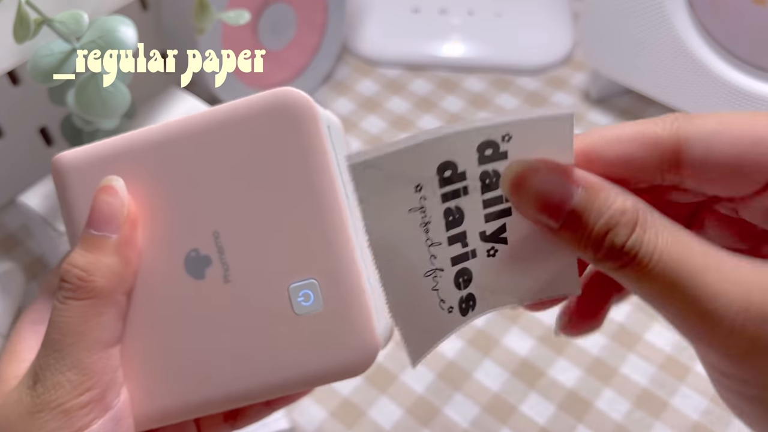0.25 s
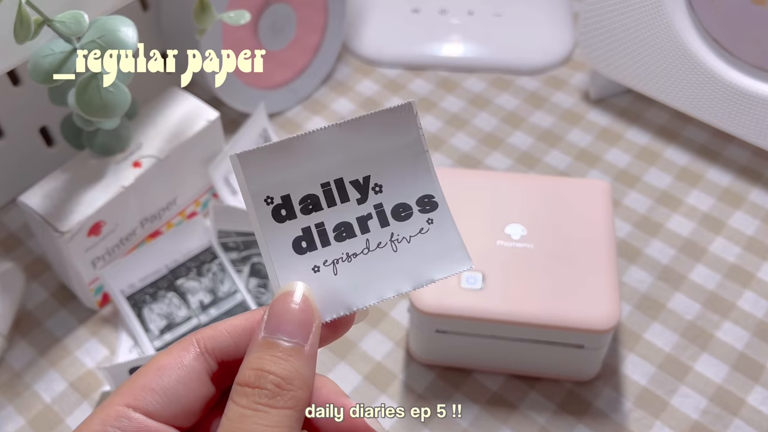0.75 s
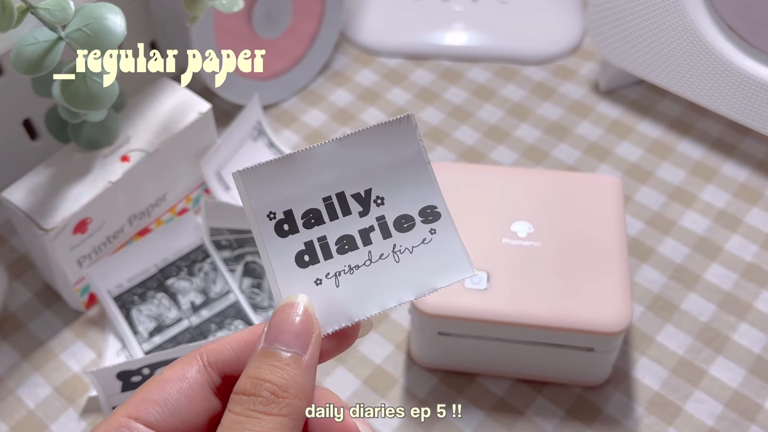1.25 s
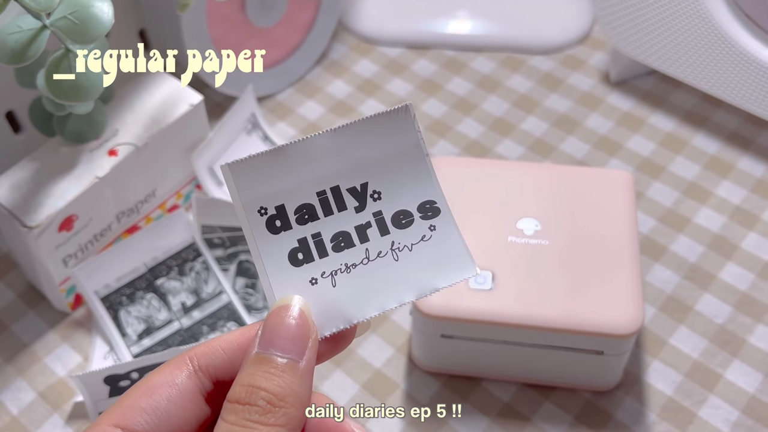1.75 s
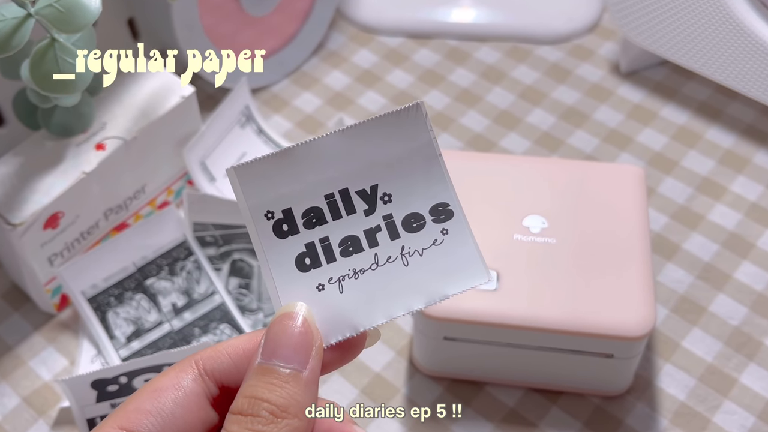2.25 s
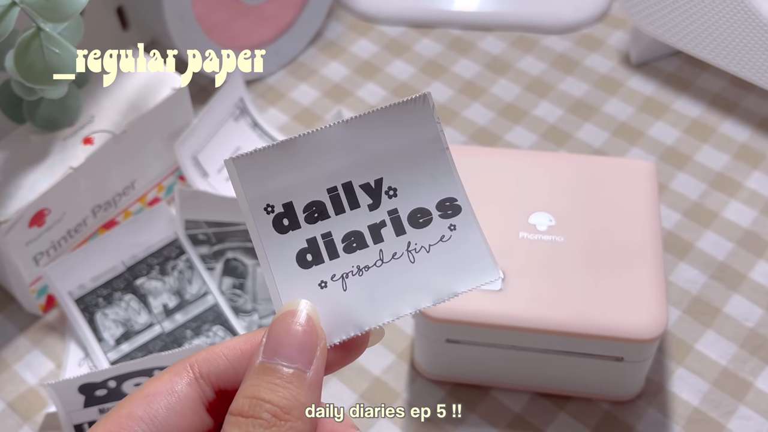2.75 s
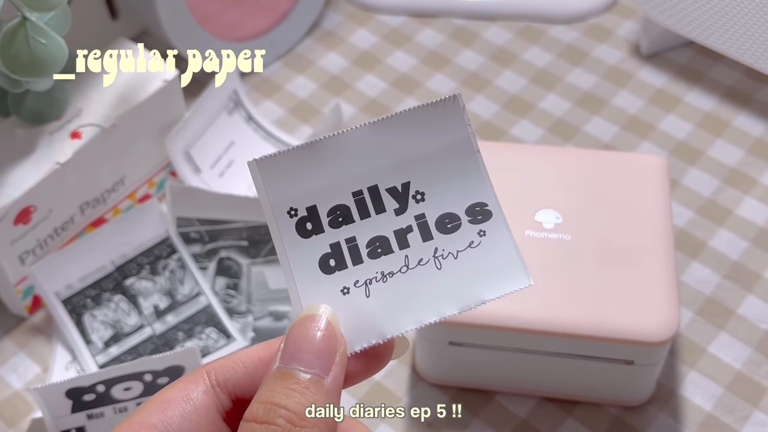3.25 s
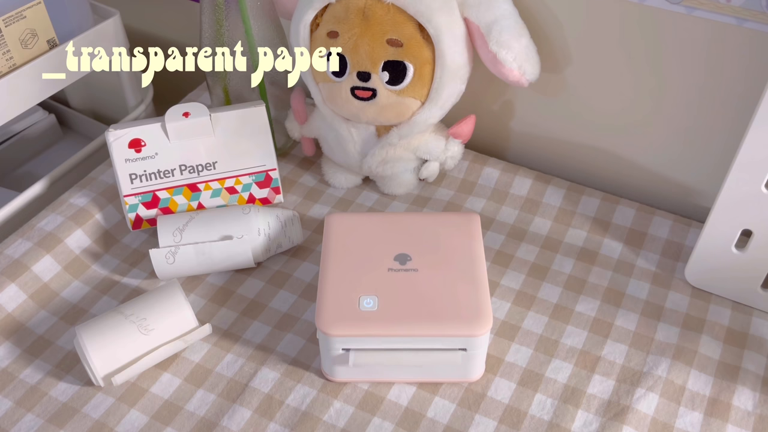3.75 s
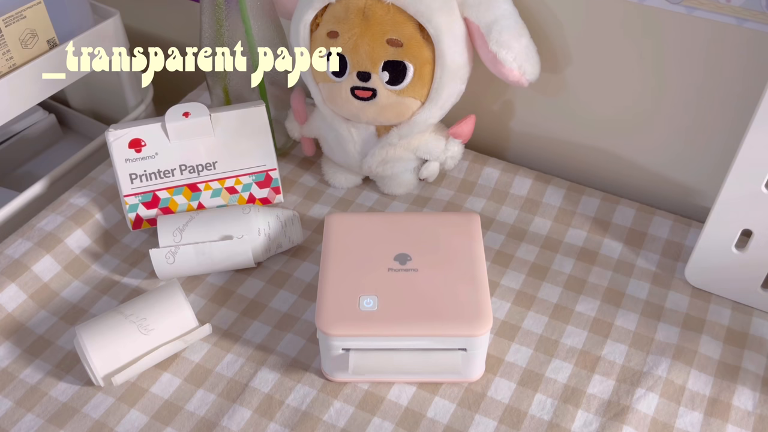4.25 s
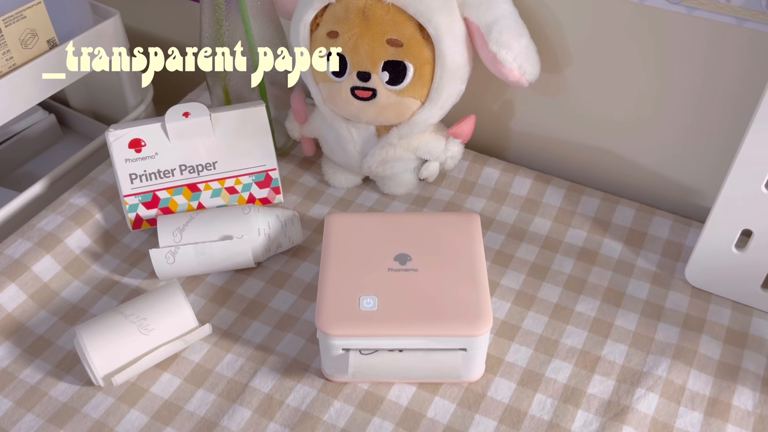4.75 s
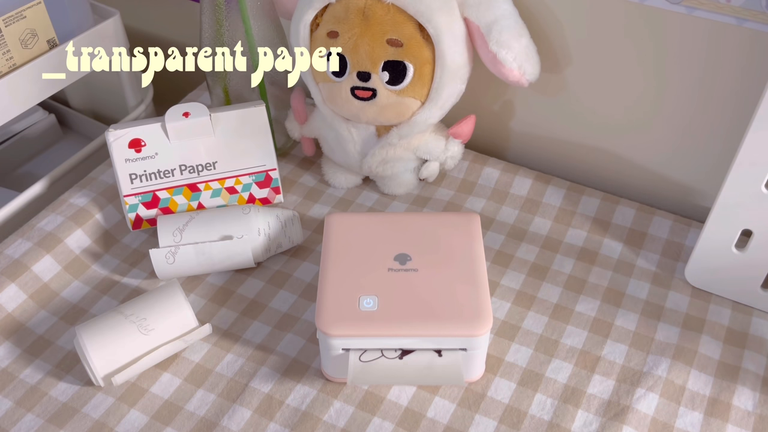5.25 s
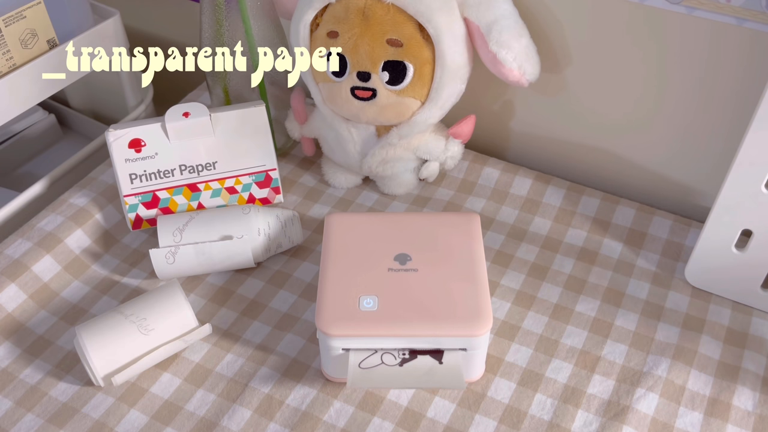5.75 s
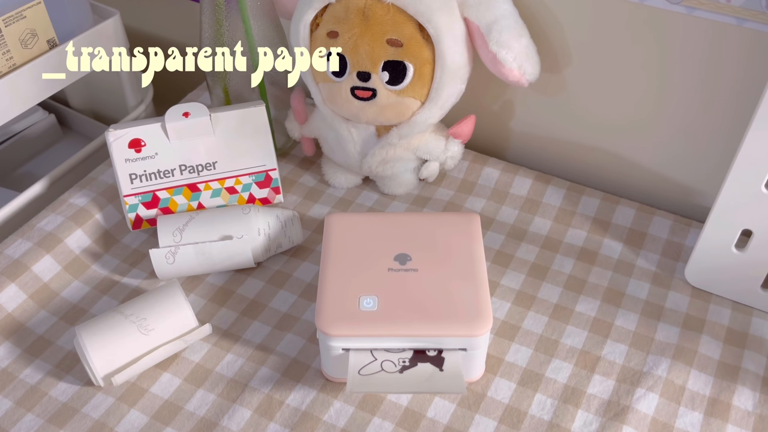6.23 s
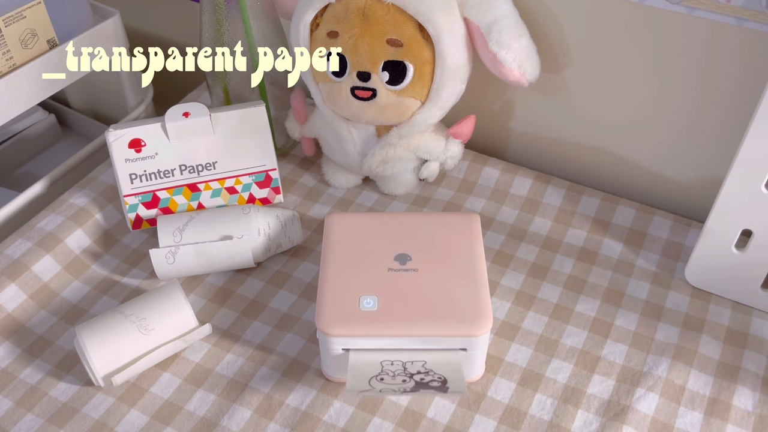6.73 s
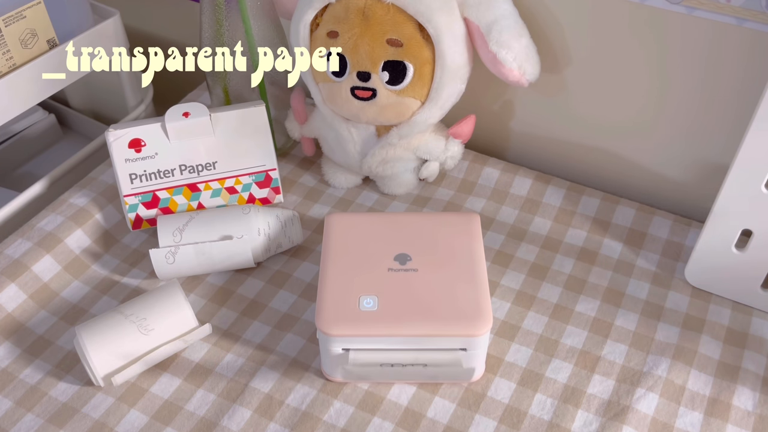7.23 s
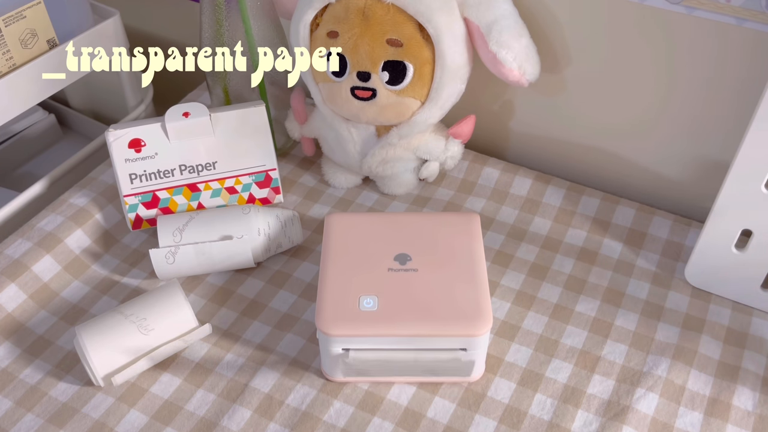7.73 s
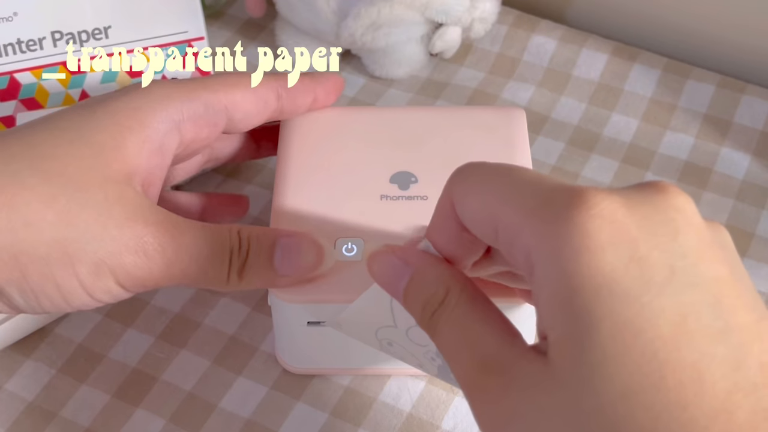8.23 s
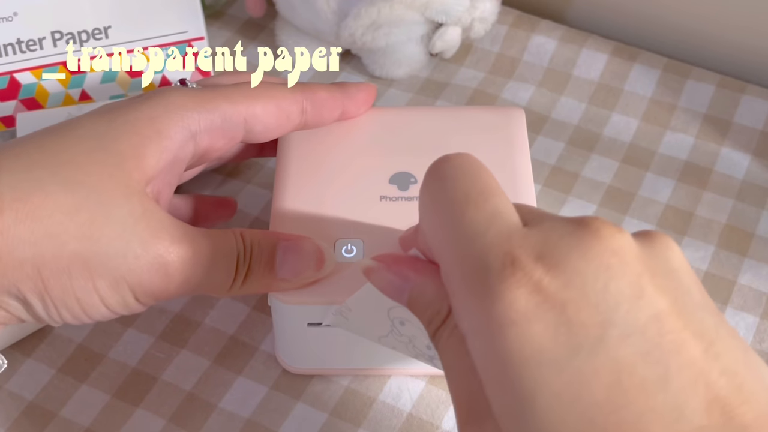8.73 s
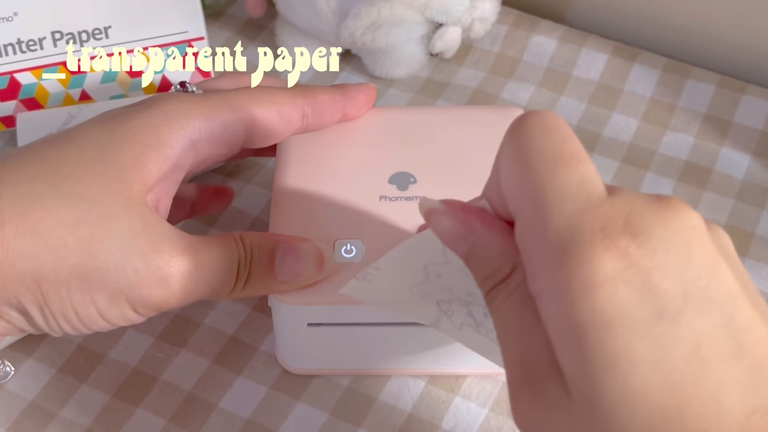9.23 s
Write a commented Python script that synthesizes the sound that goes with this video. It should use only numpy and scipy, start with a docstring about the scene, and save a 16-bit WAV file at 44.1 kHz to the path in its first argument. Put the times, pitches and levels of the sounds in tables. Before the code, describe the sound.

Close stereo pickup on a desk in a quiet room with faint low rumble. Thin paper rustles briefly, with one small crack and a crisp double-snap mouse click. After nearly three seconds of quiet, an identical click starts a small printer motor, buzzing steadily at low pitch with gear rattle. It stops abruptly; light paper touches follow, then a slip is torn off in increasingly loud, dry cracks.

```python
"""Paper rustles under moving fingers, as swelling noise bands, over a room's rumbling, hissing filtered noise.
A small thermal printer lies on a desk close to two microphone ports. One early crack is heard, then a mouse button
clicks, press and release, twice identically: noise bursts through resonances. The stepper motor, a sum of
harmonics with gear noise, feeds a slip out. A hand tears it off tooth by tooth, the cracks exciting the modes
of lid and case."""
import sys
import numpy as np
from scipy import signal
from scipy.fft import rfft, irfft, next_fast_len
from scipy.io import wavfile
from scipy.ndimage import uniform_filter1d, map_coordinates

SR = 44100
rng = np.random.default_rng(int(sys.argv[2]) if len(sys.argv) > 2 else 0)


def to_linear_factor(level_db):
    """Convert decibel levels (scalar or array-like) to linear amplitude factors."""
    exponent = np.asarray(level_db, float) / 20
    return 10 ** exponent


def persist_wave(psi):
    """Save psi, clipped to +-1, as 16-bit WAV."""
    counts = np.round(np.clip(psi, -1, 1) * 32767).astype(np.int16)
    wavfile.write(sys.argv[1], SR, np.atleast_2d(counts).T)


N = 418068
T = np.arange(N) / SR  # time in seconds

# Level of the room's rumble. Each row: time in seconds, level in dB.
RUMBLE_LEVEL = [(0.0, -44), (0.36, -52.5), (0.79, -43.5), (1.4, -46), (2.3, -42.5), (2.66, -36),
                (2.87, -44), (3.5, -44.5), (3.83, -52), (4.81, -48), (5.6, -51), (7.14, -47.5), (7.33, -57),
                (7.71, -49), (7.97, -54), (8.35, -48), (8.5, -37.5)]
# Spectrum of the rumble. Each row: frequency in Hz, relative density in dB.
RUMBLE_SPECTRUM = [(15, -39.5), (25, -9.5), (48, 3.5), (69, -0.5), (83, -7), (108, -17), (141, -19),
                   (172, -32), (400, -44.5), (520, -73), (880, -120)]
# Spectrum of the steady hiss. Each row: frequency in Hz, relative density in dB.
HISS_SPECTRUM = [(120, -31), (200, -1.5), (269, -6.5), (361, -8.5), (445, -12), (609, -12), (791, -14),
                 (1450, -16), (2130, -19.5), (3130, -16.5), (4200, -23), (6610, -22), (10400, -29),
                 (11100, -23), (12800, -33), (16600, -64), (22000, -120)]
HISS_DB = -68
HUM_UNDER_DB, HUM_WAVERS_DB = -21.5, 3  # the hum under the rumble, and its own slow wander

# Fingers sliding on paper, a stroke a row. Each row: peak in seconds, scrape in dB, hiss in dB,
# swell in seconds, fade in seconds.
STROKES = [(0.0, -56.5, -69.5, .01, 0.16), (.192, -73, -70, 0.037, .15), (.3, -71, -59, 0.18, .045),
           (.35, -69, -74, .04, 0.3), (.474, -65.5, -68, 0.063, .06), (.658, -61, -45.5, 0.065, 0.044),
           (.73, -74, -52.5, 0.079, 0.032), (7.342, -62, -95, .03, 0.094), (7.375, -62, -95, .05, .07),
           (7.618, -79.5, -84, .02, .08), (7.73, -86, -63.5, 0.18, 0.1), (7.816, -71.5, -79, .04, .01),
           (8.202, -73, -93, .08, .04), (8.298, -88, -72, .09, 0.033), (8.418, -90, -64.5, 0.014, .06),
           (8.442, -73, -53, 0.027, 0.025), (8.495, -90, -68, .02, .02), (8.54, -90, -73, .04, .02),
           (8.598, -60, -44.5, 0.023, 0.061), (8.835, -58, -49, 0.024, 0.022)]
STROKE_SPAN_DB = 36  # how far a stroke swells and fades in those times

# Brief narrow tones. Each row: start in seconds, centre in Hz, width in Hz of each of two cascaded resonances,
# level in dB, held time in seconds, t60 in seconds.
SQUEAKS = [(0, 951, 70, -61.5, 0.036, .5), (7.338, 1343, 81, -62.5, 0.055, .05)]

# Teeth letting go. Each row: time in seconds, relative crack in dB, case knock relative to crack in dB,
# lid rap relative to crack in dB.
TEETH = [(0.6512, -24, -32.5, -12.5), (8.249, -66.5, 15.5, -5), (8.4294, -54, -17, -31),
         (8.4419, -43, -13, -33), (8.5822, -48, -20.5, -25), (8.5993, -40, -20, -29),
         (8.6074, -42, -9, -16), (8.6482, -27.5, -3.5, -7.5), (8.6963, -30.5, -12, -26),
         (8.7018, -25.5, -24, -24), (8.7069, -21.5, -8, -19), (8.74, -33.5, 9, -20.5),
         (8.843, -15.5, -4.5, -5), (8.8616, -19.5, -2, -6.5), (8.8916, -20.5, -0.5, 0),
         (8.9012, -33, 13.5, 0), (8.9333, -13, -2.5, -7.5), (8.969, -11, -5, -7.5), (8.978, -8.5, -3.5, -5),
         (9.0951, -8.5, -12, 1.5), (9.1008, -4.5, -13.5, -3.5), (9.1077, -7, -10.5, -29.5),
         (9.1174, -11.5, -2, -4), (9.1247, -11.5, -4, 6.5), (9.132, -8, -2, -6.5), (9.1371, -17.5, 3.5, -9),
         (9.1463, -16.5, 4.5, -11), (9.1533, -9.5, -3, -8.5), (9.2423, -6.5, -10.5, -4),
         (9.2708, -4, -9.5, -11), (9.3536, 0, -16.5, -7.5), (9.4425, -11, -4, -3.5),
         (9.4532, -1, -12.5, -9), (9.4595, -11.5, -4.5, 4), (9.4734, -4, -13, -1.5)]
# Spectrum of a crack. Each row: frequency in Hz, relative density in dB.
CRACK_SPECTRUM = [(1470, -28), (2500, -3.5), (3040, -11), (4050, 0), (4510, -3), (4870, 0), (7300, -13.5),
                  (8200, -7.5), (10200, -4), (11100, 1), (12300, -11.5), (13600, -28.5), (16000, -22.5)]
# Resonances of the case. Each row: frequency in Hz, width in Hz, strength in dB.
CASE_MODES = [(53.6, 14, -5.5), (100.6, 13, 0), (250, 40, 4), (426, 52, -1.5)]
# Resonances of the lid. Each row: frequency in Hz, width in Hz, strength in dB.
LID_MODES = [(548.4, 100, 1.5), (690, 91, 2.5), (804, 110, 0), (1040, 130, 3), (1280, 160, 1.5),
             (1550, 290, -6.5), (1900, 220, -8), (2620, 300, -8)]
CRACK_T60_S = 0.013
# Phase between the ports for the cutter. Each row: frequency in Hz, left lead in radians.
TEAR_LEAD = [(0, 0), (780, -1.5), (1030, -3.5), (2070, 1.96), (3700, 2), (3960, 1.25), (4480, 4),
             (5340, 3.5), (6200, 9), (7060, 3.6), (7920, -0.3), (8870, -0.5), (13100, -9), (15700, -11.5)]
# Balance of the ports for the cutter. Each row: frequency in Hz, left over right in dB.
TEAR_TILT = [(60, -0.5), (110, -1.5), (200, 2.5), (380, -2.5), (700, 2.0), (1290, 0.0), (2380, 1.5),
             (4400, 4.0), (8120, 0.5), (15000, -0.5)]
TEAR_PORTS = TEAR_LEAD, TEAR_TILT

# Start of each mouse click. Each entry: time in seconds.
CLICKS = [.7584, 3.6017]
# Contacts on press. Each row: delay after the click in seconds, relative level in dB, t60 in seconds.
PRESS_CONTACTS = [(0, -31, .02), (.001, -19.5, .006), (.0033, -10, 0.0034), (.0039, -7.5, .003),
                  (.0046, -6.5, 0.0034), (.0054, -17, .02), (.014, -45, 0.049)]
# Contacts on release. Each row: delay after the click in seconds, relative level in dB, t60 in seconds.
RELEASE_CONTACTS = [(.11, -10.5, 0.0048), (.1106, -5.5, .003), (.1114, -7.5, .004), (.112, -11, .012),
                    (.1148, -27, .015), (.123, -45, 0.064)]
# Resonances on press. Each row: frequency in Hz, width in Hz before broadening, strength in dB.
PRESS_MODES = [(2070, 71, -14), (2760, 88, -11.5), (4100, 280, -8.5), (5500, 620, -11), (6290, 130, 0),
               (7750, 120, -7), (8736, 530, -2.5), (9970, 150, 2), (11100, 220, -10), (12700, 200, -2.5),
               (13980, 340, -6)]
# Resonances on release. Each row: frequency in Hz, width in Hz before broadening, strength in dB.
RELEASE_MODES = [(1900, 300, -17.5), (2740, 330, -16), (3502, 130, -9.5), (3800, 169.7, -8),
                 (4658, 120, -10), (6520, 170, -2.5), (7966, 190, -11), (8880, 210, -9), (10566, 130, 1.5),
                 (10930, 430, -11), (13220, 190, -6.5), (13620, 360, -4.5), (15600, 170, -19)]
# Thuds of the mouse's shell. Each row: delay after the click in seconds, frequency in Hz, level in dB,
# t60 in seconds.
SHELL_THUDS = [(.002, 289.3, -19.5, 0.021), (.006, 859, -25, 0.027), (.004, 560, -31, 0.019),
               (.02, 120, -31, 0.073), (0.1087, 200, -13.5, .022), (.111, 894, -34, .015)]
# Faint hiss around each mouse click. Each row: time from the click in seconds, level in dB.
CLICK_HISS_LEVEL = [(-.004, -110), (-.003, -57.5), (.03, -57.5), (.07, -67.5), (.105, -57), (.12, -64.5),
                    (.13, -59), (.17, -68.5), (.18, -110)]

# Power to the motor. Entries: on in seconds, off in seconds.
POWER = (3.63, 7.204)
# Stages of the job. Each row: start in seconds, strain from 0 to 1, slack from 0 to 1.
STAGES = [(3.63, 0.14, .15), (5.065, .75, .2), (5.13, .45, .2), (5.76, 0.86, .3), (6.37, 0.42, 0.9)]
SHIFT_S, SURGE = 0.013, 0.21  # one stage blends into the next; the load surges by this share
PRINT_HZ, EJECT_HZ, EJECT_S = 234.14, 235.58, 6.37  # coil rate printing, then feeding blank paper from then on
STALL_HZ, STALL_S = 112, .021  # without power the rate sags to this, this fast
# Partials of the coils. Each row: multiple of the coil rate, level running light in dB, level under strain in dB,
# left lead in radians, left over right in dB.
COIL_PARTIALS = [(0.5, -15.0, -12.0, 0.0, -7.0), (1.0, 0.0, 1.0, -0.1, 0.0),
                 (1.5, -22.0, -21.0, -0.1, -1.0), (2.0, -14.0, -21.0, -1.0, -5.0),
                 (2.5, -13.0, -17.0, -0.1, -10.0), (3.0, -11.0, -12.0, 1.6, 2.0),
                 (4.0, -13.0, -14.0, 0.4, 1.0), (4.5, -28.0, -29.0, -0.6, 4.0),
                 (5.0, -14.0, -16.0, 0.2, -5.0), (5.5, -21.0, -24.0, -0.2, -1.0),
                 (6.0, -22.0, -24.0, -0.3, 2.0), (6.5, -26.0, -26.0, -0.3, 10.0),
                 (7.0, -33.0, -37.0, 0.2, 6.0), (7.5, -35.0, -31.0, 1.9, 9.0),
                 (8.0, -26.0, -21.0, -0.6, 11.0), (9.5, -26.0, -27.0, 2.3, 0.0),
                 (10.0, -14.0, -12.0, 1.8, 2.0), (10.5, -33.0, -31.0, 1.1, 2.0),
                 (11.0, -29.0, -24.0, 2.2, 4.0), (12.0, -34.0, -17.0, 1.6, 0.0),
                 (13.0, -35.0, -34.0, -2.6, 5.0), (14.0, -33.0, -18.0, 2.0, 4.0),
                 (15.0, -39.0, -38.0, 1.4, 0.0), (16.0, -36.0, -22.0, 0.8, 8.0),
                 (17.0, -42.0, -39.0, 2.4, 3.0), (18.0, -36.0, -31.0, -2.8, 2.0),
                 (19.0, -39.0, -32.0, 2.7, 9.0), (20.0, -21.0, -24.0, -2.0, 5.0),
                 (21.0, -39.0, -28.0, -2.6, 7.0), (22.0, -35.0, -18.0, 2.1, 2.0),
                 (22.5, -36.0, -23.0, 2.9, 9.0), (23.0, -36.0, -33.0, 2.3, 7.0),
                 (23.5, -38.0, -36.0, -2.9, 7.0), (24.0, -33.0, -28.0, 3.1, 3.0),
                 (25.0, -56.0, -38.0, -2.5, 2.0), (26.0, -42.0, -34.0, -2.3, 3.0),
                 (28.0, -49.0, -41.0, 0.6, 2.0), (30.0, -44.0, -36.0, 2.7, 0.0),
                 (32.0, -43.0, -29.0, 2.3, 10.0), (34.0, -51.0, -30.0, 0.0, 4.0),
                 (36.0, -47.0, -38.0, -0.1, 0.0), (42.0, -41.0, -39.0, -2.9, 0.0),
                 (44.0, -47.0, -28.0, 3.1, 0.0), (45.0, -46.0, -33.0, 2.8, 0.0),
                 (46.0, -46.0, -31.0, 2.4, 1.0), (48.0, -50.0, -45.0, 1.4, 0.0),
                 (50.0, -47.0, -48.0, 0.0, 0.0), (52.0, -48.0, -50.0, -0.0, 0.0)]
# Spectrum of the gears' whirr. Each row: frequency in Hz, relative density in dB.
WHIRR_SPECTRUM = [(60, -42), (110, 1), (300, -13.5), (700, -6), (1200, -11.5), (1600, -19), (2200, -11.5),
                  (2700, -27.5), (3500, -40), (6000, -93.5)]
# Spectrum of the gears' rattle before strain brightens it. Each row: frequency in Hz, relative density in dB.
RATTLE_SPECTRUM = [(1470, -35.5), (2500, -9.5), (2900, -1.5), (2960, -3.5), (3200, 3.5), (3950, -6.5),
                   (4820, 1.5), (6210, -9), (7680, -10.5), (10000, -13.5), (11200, -14.5), (12700, -22),
                   (13500, -51.5)]
TONE_DB, WHIRR_DB = -46, -55  # the tone's level is that of a partial at 0 dB
RATTLE_DB, STRAINED_RATTLE_DB = -66, 4  # before strain and slack; the last is added at full strain
# The two ports for the motor, two lists. Each row of the first: frequency in Hz, left lead in radians;
# of the second: frequency in Hz, left over right in dB.
FEED_PORTS = [(0, -0.5), (690, 2), (1890, 0.58), (2240, 1.46), (3270, 1.5), (4480, -0.5), (5680, 1.5),
              (6550, -0.6), (8790, 1.96), (9730, -5), (10600, -10.5), (11600, -1), (12500, -10.5),
              (15700, -15.5)], [(60, -6), (110, -8), (200, 2), (380, 0.5), (700, -2), (1290, 4),
              (2380, 1.5), (4400, 8), (8120, 1), (15000, -1.5)]

# The room's answer. Each row: frequency in Hz, t60 in seconds, relative strength in dB.
WALLS = [(150, 0.52, -15.5), (493, 0.12, 2.5), (2000, 0.297, -6), (5070, 0.17, -5), (12000, 0.41, -11.5),
         (14000, 0.12, -22)]


def unit(x):
    """Normalisation: scaled to rms 1."""
    return x / np.sqrt(np.mean(x ** 2) + 1e-20)


def along(points, hz):
    """Interpolation of (Hz, value) points on a logarithmic frequency axis."""
    f, v = np.transpose(points)
    return np.interp(np.log(hz + 1), np.log(f + 1), v)


def curves(rows):
    """Linear interpolation: one value per sample for each column after the time."""
    s, *cols = np.transpose(rows)
    return [np.interp(T, s, c) for c in cols]


def wobble(rate):
    """Band-limited fluctuation: a smooth random curve, rate knots a second."""
    return map_coordinates(rng.standard_normal(int(N * rate / SR) + 4), [T * rate])


def filtered(x, response):
    """Linear filtering: the spectrum of x times a complex response of frequency."""
    n = x.shape[-1]
    m = next_fast_len(n + 8192)
    return irfft(rfft(x, m) * response(np.fft.rfftfreq(m, 1 / SR)), m)[..., :n]


def coloured(x, spectrum):
    """Spectral shaping: x through a (Hz, dB) spectrum, rms 1."""
    return unit(filtered(x, lambda hz: to_linear_factor(along(spectrum, hz))))


def modes(table):
    """Modal superposition: the causal response of (Hz, width, dB) resonances, alternating in sign."""
    def response(f):
        total = 0
        for k, (centre, width, db) in enumerate(table):
            damping = 1j * f * width
            total = total + (-1) ** k * to_linear_factor(db) * damping / (centre * centre - f * f + damping)
        return total
    return response


def pair(spectrum, share):
    """Partial coherence: stereo noise with a share of its power common to both ports."""
    common, left, right = rng.standard_normal((3, N))
    share = np.clip(share, 0, 1)
    return coloured(np.sqrt(share) * common + np.sqrt(1 - share) * np.array([left, right]), spectrum)


def dying(s, db, t60, t):
    """Exponential decay: an envelope that jumps up at s and falls 60 dB in t60."""
    return to_linear_factor(db - 60 * np.clip(t - s, 0, 1) / t60) * (t >= s)


def ports(x, table):
    """Near-field reception: a near source reaches the two ports with its own phase and balance."""
    lead, tilt = table
    side = np.array([[.5], [-.5]])

    def response(hz):
        phase = side * np.interp(hz, *np.transpose(lead))
        return to_linear_factor(side * along(tilt, hz)) * np.exp(1j * phase)
    return filtered(x, response)


def walls(x):
    """Reverberation: each frequency of the room's answer has its own strength and rate of decay."""
    hz, t, z = signal.stft(rng.standard_normal((2, SR // 2)), SR, nperseg=256)
    t60, db = (along([(row[0], row[k]) for row in WALLS], hz)[:, None] for k in (1, 2))
    tail = signal.istft(z * to_linear_factor(db - 60 * t / t60) / np.sqrt(t60), SR, nperseg=256)[1]
    tail = tail / np.linalg.norm(tail[0])
    delayed = np.pad(x, (200, 0))  # samples
    return signal.fftconvolve(delayed[None], tail, axes=1)[:, :N]


def rub():
    """Sliding friction on thin paper: a dull scrape and a bright, grainy hiss swell and fade with each stroke."""
    grain = to_linear_factor(2.5 * wobble(300))
    scrape = pair([(100, -120), (400, -27), (900, -2.5), (1400, -5), (3500, -4.5), (6000, -23.5),
                   (16000, -120)], share=0.46)
    hiss = pair([(500, -120), (2500, -22), (5500, -11.5), (7500, -12.5), (9200, -2.5), (10300, -10.5),
                 (11300, -0.5), (12500, -10.0), (16000, -120)], share=0.4)
    low, high = np.zeros((2, N))
    for s, scrape_db, hiss_db, swell, fade in STROKES:
        near = slice(max(0, round((s - 2 * swell) * SR)), round((s + 2 * fade) * SR))
        stroke = to_linear_factor(-STROKE_SPAN_DB * np.maximum((s - T[near]) / swell, (T[near] - s) / fade))
        low[near] += to_linear_factor(scrape_db) * stroke
        high[near] += to_linear_factor(hiss_db) * stroke
    return grain * (low * scrape + high * hiss)


def room():
    """Ambient noise: low rumble, a wavering hum that swells with it and a steady hiss."""
    rumble_db, = curves(RUMBLE_LEVEL)
    balance = [[.5], [-.5]]  # dB, left and right
    rumble = to_linear_factor(rumble_db + balance + 1.6 * wobble(6)) * pair(RUMBLE_SPECTRUM, share=0.94)
    hum_db = rumble_db + HUM_UNDER_DB + HUM_WAVERS_DB * wobble(1.7)
    hum = to_linear_factor(hum_db) * pair([(90, -43.0), (125, -6), (140, 1.5), (155, -8.5), (200, -40.0), (400, -120)],
                             share=0.44)
    return rumble + hum + to_linear_factor(HISS_DB) * pair(HISS_SPECTRUM, share=0.028)


def squeaks():
    """Narrow-band resonance: noise confined to slim bands that hold briefly and fade."""
    total = np.zeros((2, N))
    for s, hz, width, db, held, t60 in SQUEAKS:
        resonance = modes([(hz, width, 0)])
        band = unit(filtered(rng.standard_normal((2, N)), lambda f: resonance(f) ** 2))
        total += (T >= s) * to_linear_factor(db - 60 * np.clip(T - s - held, 0, 9) / t60) * band
    return total


def tear():
    """Impulsive excitation of modes: each tooth's short crack raps the lid, then the case rocks and knocks
    on the desk."""
    crack, rap, push = np.zeros((3, N + SR))
    t = np.arange(SR // 4) / SR
    for s, db, knock_db, lid_db in TEETH:
        burst = (1 - np.exp(-t / 0.00093)) ** 2 * dying(0, db + 7.0, CRACK_T60_S, t)
        crack[round(s * SR):][:len(t)] += burst + dying(0.002, db - 33, 0.1, t)
        rap[round((s + .001) * SR):][:len(t)] += to_linear_factor(lid_db) * (burst + dying(0, db - 21, .18, t))
        jolt = np.exp(-t / 0.0012) * (.4 * rng.standard_normal(len(t)) - 1)
        push[round((s + .0035) * SR):][:len(t)] += to_linear_factor(db + knock_db + 19) * jolt
    fibres = to_linear_factor(2.5 * wobble(1500)) * pair(CRACK_SPECTRUM, share=0.87)
    grit = to_linear_factor(8.5) * rap[:N] * unit(to_linear_factor(3.3 * wobble(900)))
    knocks = pair([(20, 0), (20000, 0)], share=0.72)
    lid = np.zeros((2, N))
    for mode in LID_MODES:  # each rap favours other modes
        lid += filtered(to_linear_factor(3.2 * wobble(35)) * grit * knocks, modes([mode]))
    case = filtered(push[:N], modes(CASE_MODES))
    rip = to_linear_factor(-1.5) * crack[:N] * unit(fibres) + lid + case
    return ports(rip, TEAR_PORTS) + to_linear_factor(-15.5) * walls(rip.mean(axis=0))


def mouse_click():
    """Contact bounce: a mouse button snaps down and up identically each time, its shell thuds, a hiss surrounds it."""
    t = np.arange(SR // 4) / SR
    snap = 0
    for contacts, ring in ((PRESS_CONTACTS, PRESS_MODES), (RELEASE_CONTACTS, RELEASE_MODES)):
        wide = modes([(hz, 2.5 * width, db) for hz, width, db in ring])
        size = np.sqrt(np.mean(np.abs(wide(np.fft.rfftfreq(4096, 1 / SR))) ** 2))
        jolts = sum(dying(*row, t) for row in contacts) * rng.standard_normal(len(t))
        for s, db, _ in contacts:
            jolts[round(s * SR)] += 3.0 * to_linear_factor(db)  # each contact starts with one sharp blow
        snap = snap + to_linear_factor(-3) * filtered(jolts, lambda f: wide(f) * (1j * f / (1200 + 1j * f)) ** 3) / size
    for s, hz, db, t60 in SHELL_THUDS:
        onset = np.tanh((s - t) / .002)  # a soft start, with the sign reversed
        snap = snap + dying(s, db, t60, t) * onset * np.sin(2 * np.pi * hz * (t - s))
    when = np.zeros(N)
    when[[round(s * SR) for s in CLICKS]] = 1
    hiss_level = sum(to_linear_factor(np.interp(T - s, *np.transpose(CLICK_HISS_LEVEL))) for s in CLICKS)
    hiss = coloured(rng.standard_normal(N), [(500, -21.0), (2000, 3.5), (15500, -2.0), (16500, -40), (18000, -120)])
    return signal.fftconvolve(when, snap)[:N] + hiss_level * hiss


def drive():
    """Load dynamics: coil rate, strain and slack of the motor over time."""
    start, *controls = np.transpose(STAGES)
    stage = np.clip(np.searchsorted(start, T) - 1, 0, None)
    blended = []
    for c in controls:
        steady = uniform_filter1d(c[stage], size=max(1, round(SHIFT_S * SR)))
        blended.append(np.clip(SURGE * wobble(14) * c[stage] + steady, 0, 1))
    strain, slack = blended
    hz = np.where(T < EJECT_S, PRINT_HZ, EJECT_HZ)
    hz = hz + (STALL_HZ - hz) * np.clip((T - POWER[1]) / STALL_S, 0, 1)
    return hz, strain, slack


def coils(turn, strain, powered):
    """Harmonic synthesis: the coils sing at multiples of a common rate, brighter under strain."""
    coast = to_linear_factor(-60 * np.clip(T - POWER[1], 0, 1) / 0.3) * uniform_filter1d(1. * (T > POWER[0]), size=600)
    on = slice(round(3.6 * SR), round(7.4 * SR))
    tone, side = np.zeros((2, N)), np.array([[.5], [-.5]])
    drift = [wobble(6)[on] for _ in range(5)]
    flutter = [wobble(30)[on] for _ in range(3)]
    for i, (k, light_db, strained_db, lead, tilt_db) in enumerate(COIL_PARTIALS):
        db = light_db + (strained_db - light_db) * strain[on]
        db = db + (k != 1) * (1.2 * drift[i % 5] + 1.9 * flutter[i % 3] - .6)  # the fundamental is spared this
        alive = coast[on] if k < 4 else powered[on]  # only the low partials outlast the power
        phase = k * turn[on] + side * lead + rng.uniform(0, 2 * np.pi)
        tone[:, on] += alive * to_linear_factor(db + side * tilt_db) * np.sin(phase)
    return np.sqrt(2) * to_linear_factor(TONE_DB + 0.87 * wobble(5)) * tone


def gears(turn, strain, slack, powered):
    """Amplitude modulation by rotation: the gears whirr and tick in step with the coils, over a rattle."""
    gate = 1 + .5 * np.cos(turn / 2) + .3 * np.cos(turn)  # the load pulses with the coil cycle
    whirr = coloured(gate * to_linear_factor(1.0 * wobble(14)) * rng.standard_normal(N), WHIRR_SPECTRUM)
    # a loose tooth ticks every third cycle
    ticks = slack * to_linear_factor(2.8 * wobble(70)) * (.5 + .5 * np.cos(turn / 3 + .3 * wobble(50))) ** 4000
    rattle = coloured(to_linear_factor(1.0 * wobble(30)) * rng.standard_normal(N), RATTLE_SPECTRUM)
    sizzle = filtered(rattle, lambda f: (1j * f / (6000 + 1j * f)) ** 4)
    rattle = rattle + (to_linear_factor(10.5 * (strain + 0.7)) - 1) * sizzle  # strain brightens the rattle
    rattle = rattle + to_linear_factor(33) * filtered(ticks, lambda f: modes([(3300, 700, -1.5), (4400, 800, 0)])(f) ** 2)
    whirr_db = WHIRR_DB + 0.53 * wobble(3.95)
    rattle_db = RATTLE_DB + STRAINED_RATTLE_DB * strain - 3.5 * slack + 0.904 * wobble(7.9)
    return powered * (to_linear_factor(whirr_db) * whirr + to_linear_factor(rattle_db) * rattle)


def motor():
    """Shared rotation: one turning phase drives the coils' tone and the gears' noise; the walls answer the gears."""
    hz, strain, slack = drive()
    turn = 2 * np.pi * np.cumsum(hz) / SR
    powered = uniform_filter1d(1. * ((T > POWER[0]) & (T < POWER[1])), size=300)
    noise = gears(turn, strain, slack, powered)
    return coils(turn, strain, powered) + ports(noise, FEED_PORTS) + to_linear_factor(-9) * walls(noise)


def scene():
    """Linear superposition: the paper, room, printer and mouse clicks summed together."""
    return rub() + room() + squeaks() + tear() + mouse_click() + motor()


def band_limit(x):
    """A steep low-pass at the top of the band."""
    return signal.sosfilt(signal.butter(12, 16140, fs=SR, output="sos"), x)


def record(dry):
    """High-pass response and clipping: the deepest bass falls away and peaks are limited to full range."""
    heard = filtered(dry, lambda hz: (1j * hz / (36 + 1j * hz)) ** 3)
    mix = np.clip(heard, -1, 1)  # the loudest cracks touch the top of the range
    return band_limit(mix)


dry = scene()
out = record(dry)
persist_wave(out)
```